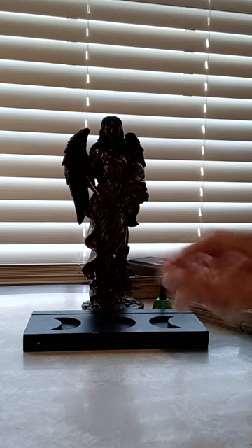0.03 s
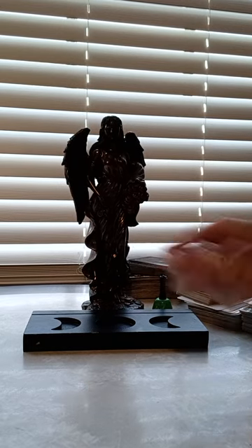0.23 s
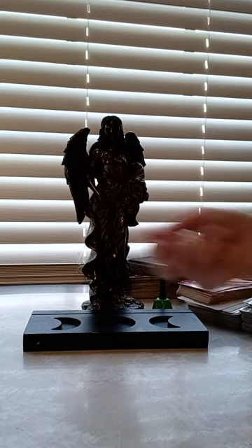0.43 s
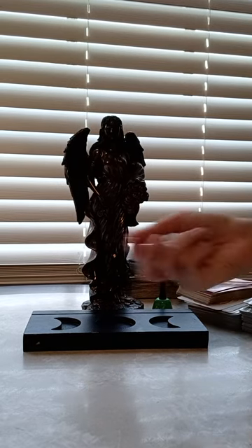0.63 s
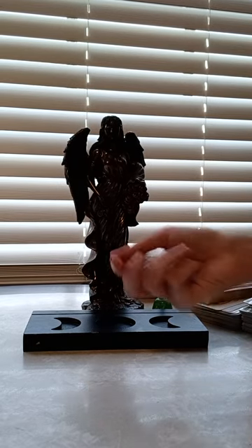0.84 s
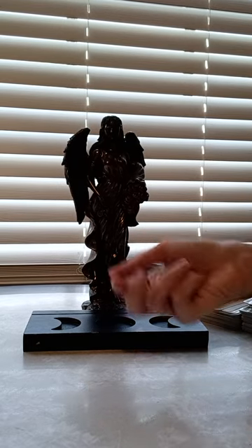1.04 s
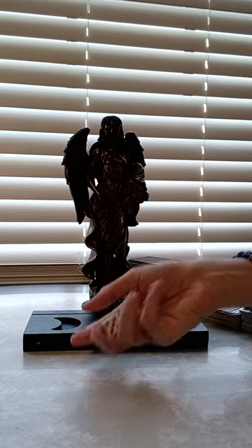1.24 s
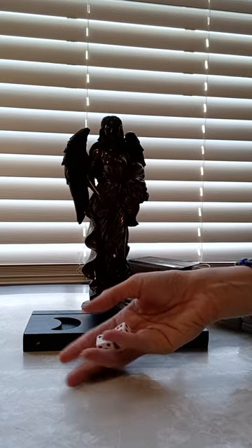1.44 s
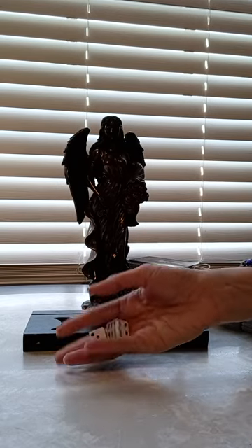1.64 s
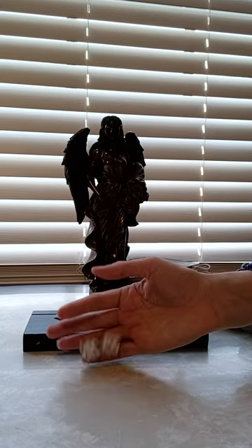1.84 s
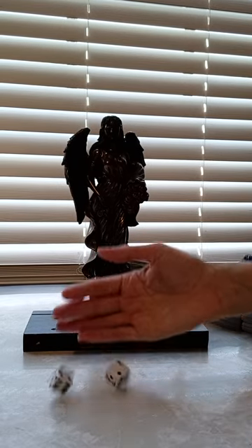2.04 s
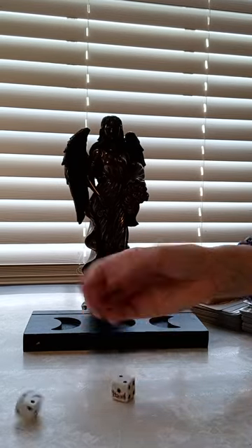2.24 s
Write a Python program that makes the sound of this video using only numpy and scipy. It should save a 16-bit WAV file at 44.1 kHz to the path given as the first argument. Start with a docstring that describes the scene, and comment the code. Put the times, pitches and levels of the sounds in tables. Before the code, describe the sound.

Dice shaken in a hand give bright, irregular clicks, a brief lull follows, then a dense run of hard knocks as they roll on a table, with short room reflections and a faint low rumble beneath.

```python
"""Dice shaken and thrown

Two plastic dice click in a cupped hand, right of a phone, in a small quiet room: broad resonances that swell and die.
They roll off the palm and tumble on a hard table top: each contact ticks, knocks and rings the table's modes.
The room answers with decaying noise; beneath lie a steady hush and a wavering rumble, noise in low resonances."""
import sys
import numpy as np
from scipy import signal
from scipy.io import wavfile

SR = 44100
rng = np.random.default_rng(int(sys.argv[2]) if len(sys.argv) > 2 else 0)


def unload_wav(signal):
    """Save mono or channel-first audio to the path in sys.argv[1] as 16-bit WAV at rate SR, clipped to [-1, 1]."""
    wavfile.write(
        sys.argv[1],
        SR,
        np.round(np.clip(np.atleast_2d(signal).T, -1, 1) * 32767).astype(np.int16),
    )


def nominal_scale(level):
    """Amplitude ratio for a level in decibels (scalar or array-like)."""
    x = np.asarray(level, float) / 20
    return 10 ** x


N = 100900  # samples

# Room air. Each row: frequency in Hz, relative density in dB per Hz.
AIR_SPECTRUM = [(25, -36.5), (60, -16), (149, -5.5), (285, -10), (405, -14), (607, -13), (1000, -18),
                (1520, -23.5), (1890, -22.5), (2900, -30.5), (4200, -33.5), (6200, -33.5), (8000, -48),
                (11000, -54.5), (15000, -46)]
# Likeness of the channels in all diffuse noise. Each row: frequency in Hz, left-right correlation from -1 to 1.
CHANNEL_LIKENESS = [(60, 0.92), (180, 1), (550, 0.54), (1650, -0.18), (4970, -0.13), (15000, -0.067)]
# Channel balance of the air. Each row: frequency in Hz, left minus right in dB.
AIR_BALANCE_DB = [(60, 8.5), (180, 0), (550, -3), (1650, -4.5), (4970, 4), (15000, 1.5)]
AIR_RMS_DB = -66.5

# Rumble resonances. Each row: frequency in Hz, width in Hz, relative level in dB.
RUMBLE_MODES = [(62, 27, -13), (94.8, 6.7, -8.5), (152.6, 8.1, -0.6), (206.9, 13, -5), (275.9, 4.7, -5),
                (411, 20, -10.5), (554, 14, -18)]
# Rumble level over time. Each row: time in seconds, level in dB.
RUMBLE_LEVEL = [(0.0, -65.5), (0.148, -65.5), (0.18, -76.5), (0.57, -89), (0.62, -59), (0.712, -68),
                (0.734, -53.5), (0.954, -59.5), (0.976, -92), (1.184, -69.5), (1.47, -65.5), (1.546, -54),
                (1.59, -76), (1.716, -62.5), (1.826, -56), (1.97, -54.5)]
# Share of the swell that each rumble resonance follows, one number a resonance, no unit.
RUMBLE_FOLLOWS = [0.62, .6, 0.79, 0.73, 0.26, 0.35, 0.34]
RUMBLE_FLICKER_DB, RUMBLE_FLICKER_HZ, RUMBLE_PAN_DB = -0.5, 1.3, -1  # pan: left minus right

# Die on die in the hand. Each row: start in seconds, level in dB, extra level of the dull parts in dB,
# extra level of the bright parts in dB, room send relative to the direct click in dB.
HAND_CLICKS = [(0.0468, -20.5, -33, -17, 2.5), (0.0506, -29, -32, -28, -1),
               (0.0526, -25, -19.5, -21.5, 2.5), (0.0644, -36.5, -29, -23, -0.5),
               (0.0714, -29, -29, -18, -1.5), (0.154, -13.5, -25.5, -31.5, -2),
               (0.1679, -27.5, -22, -25, -4), (0.188, -36, -11, -33, 5.5), (0.23, -25, -24, -18, 6.5),
               (0.2367, -27.5, -20, -14.5, -3.5), (0.2472, -26, -21.5, -44, 5.5),
               (0.2573, -46, -4, -5, -12.5), (0.2688, -36, -13, -22, -2.5), (0.2916, -32.5, -26, -31, 8.5),
               (0.3167, -23.5, -35, -29, -8.5), (0.3522, -16, -30.5, -24.5, -1),
               (0.369, -35.5, -13.5, -32, 1.5), (0.422, -19.5, -22, -21, 4.5), (0.4273, -30, -34, -37, 14),
               (0.4336, -42, -23, -28, -5), (0.5437, -20.5, -29.5, -44, -1.5),
               (0.609, -23.5, -25, -12.5, 5), (0.6201, -32.5, -17, -21, -1), (0.6915, -25, -8.5, -10, 3),
               (0.699, -28, -2.5, -31, -12.5), (0.7569, -32.5, -19, -14.5, 8.5), (0.7744, -43, 2, -22, 1.5),
               (0.7865, -31.5, -13, -4.5, 2.5), (0.7908, -45, -1, -26, -1.5), (0.8229, -43, -23, -29, -1),
               (0.8422, -34.5, -19, -29, -0.5), (0.868, -33.5, -29, -28, -11),
               (0.9774, -29.5, -36, -12.5, 3.5), (0.9848, -52, -3, -11, -6), (0.9918, -46, -30, -9, -21),
               (1.0043, -41, -35, -12, -6), (1.038, -23, -44, -22.5, -9.5), (1.065, -33, -24.5, -35, -3.5),
               (1.171, -30, -34.5, -13.5, 2), (1.1766, -33.5, -33, -11, -5), (1.2874, -28, -29, -16.5, 2),
               (1.2987, -44.5, -24, -13, 0), (1.3157, -29.5, -34, -17, -5), (1.3287, -31, -38, -23.5, -11),
               (1.343, -42, -36, -14, -14.5), (1.3528, -39.5, -37, -20.5, -21.5),
               (1.3544, -40.5, -28, -12, -16.5), (1.7699, -41.5, -25, -14, -9.5),
               (1.7776, -48, -28, -41, 4), (1.7895, -48, -12, -42, -0.5), (1.797, -44.5, -20, -17, -12),
               (1.8001, -45.5, -28, -23.5, -20.5), (1.8077, -48.5, -23.5, -20.5, -21),
               (1.9459, -59, -46.5, -23, -8), (1.973, -50, -33, -29, -11.5)]
# Broad resonances of a die click as the phone hears it; the one near 5.9 kHz is probably the microphone's.
# Each row: frequency in Hz, relative level in dB, t60 in seconds before shortening,
# share of the dull dB, share of the bright dB.
CLICK_PARTS = [(2090, -2.5, 0.0028, 0.75, 0), (2902, 2, 0.0045, 0.8, 0), (3757, -6.5, 0.0024, 0.3, 0),
               (4650, -6, 0.0048, 0.17, 0), (5924, -2.5, 0.0044, 0, 0), (7050, 0, 0.003, 0, 0.42),
               (8880, 6.5, 0.0022, 0, 0.81), (10600, -4.5, 0.00074, 0, 0.72),
               (14970, -13.5, 0.0016, 0, 0.3)]
PART_SPREAD_DB, PITCH_SPREAD_SHARE, PHASE_SPREAD_CYCLES = 1.5, 0.045, 0.12
DIRECT_T60_SHARE, ROOM_T60_SHARE = 0.82, 0.44
DIE_LOW_CUT_HZ = 2020
# The more the fingers hide a click, the more central it is. Pan: left minus right.
HAND_PAN_DB, HAND_PAN_PER_ROOM_DB, LEFT_LAG_S = -6.5, 0.5, 0.0002765

# Room tail. Each row: frequency in Hz, relative level in dB, t60 in seconds.
ROOM_TAIL = [(300, 1.5, 0.63), (720, 3.5, 0.68), (1500, 4.5, 0.15), (2600, 2.5, 0.44), (3890, 11.5, 0.27),
             (5740, 3.5, 0.33), (9630, 5, 0.2), (12880, 12.5, 0.21), (15500, -6, .26)]
ROOM_DELAY_S, ROOM_RISE_S, ROOM_GAIN_DB = 0.001, 0.0083, 0
ECHOES_PER_S, ECHO_DB, ECHO_T60_S = 300, 2, 0.067

# Die on table. Each row: start in seconds, knock level in dB, tick level relative to the knock in dB.
TABLE_BOUNCES = [(1.9874, -21.5, -10), (1.9925, -18.5, -5.5), (2.0045, -19, -15.5), (2.0169, -27, -5.5),
                 (2.044, -18.5, -6), (2.073, -21.5, -6), (2.0765, -20.5, -5), (2.0967, -20.5, -11),
                 (2.1103, -21.5, -5), (2.135, -21.5, -12.5), (2.1555, -20.5, -21.5), (2.162, -24.5, -11),
                 (2.1777, -20.5, -14), (2.187, -22.5, -5.5), (2.200, -25.5, -10.5), (2.2156, -23, -6),
                 (2.2287, -19.5, -6.5), (2.243, -31, -2.5), (2.2598, -21.5, -5.5), (2.268, -22, -7.5),
                 (2.279, -29, -14)]
# Table top modes. Each row: frequency in Hz, relative level in dB, t60 in seconds of one resonator pass.
TABLE_MODES = [(102, -32.5, 0.18), (215, -30, 0.087), (328.3, -26, 0.095), (430.8, -23, 0.105),
               (565.5, -27, 0.053), (708, -21.5, .04), (870, -24.5, 0.036), (975, -21, 0.035),
               (1229, -10, 0.031), (1515, -12, 0.0057), (1773, -4, 0.0091), (1960, -13.5, 0.0036),
               (2304, -11.5, 0.0092), (2730, -14.5, 0.0047), (3290, -19, 0.016), (3697, -20, 0.0061)]
MODE_SPREAD_DB, DOUBLE_ABOVE_HZ, KNOCK_LAG_S = 2, 1500, 0.00082
TICK_GAIN_DB, TICK_DULL_DB, TICK_BRIGHT_DB, TICK_ROOM_GAIN_DB = 7, -12.5, -23.5, 9
TICK_PAN_DB, TABLE_PAN_DB, TABLE_ROOM_GAIN_DB = -2.5, -9, 2.5
ROLL_COUNT, ROLL_DB, ROLL_SPREAD_DB = 40, -41, 2  # small edge contacts

MIC_BASS_CUT_HZ = 65.5


def rms_one(x):
    """Scale to rms 1."""
    return x / np.sqrt(np.mean(x ** 2) + 1e-20)


def at_hz(points, hz, column=1):
    """Read a table on a log-frequency axis."""
    points = np.array(points)
    return np.interp(np.log(hz), np.log(points[:, 0]), points[:, column])


def pan_pair_db(pan_db):
    """Left and right gains in dB, as a column, whose difference is pan_db."""
    return np.array([[pan_db / 2], [-pan_db / 2]])


def high_pass(x, order, hz):
    """Butterworth low cut."""
    return signal.sosfilt(signal.butter(order, hz, "high", fs=SR, output="sos"), x)


def bands(length):
    """Third-octave bands of stereo noise with the tabled likeness; neighbours are unrelated."""
    edges_hz = 22 * 2 ** (np.arange(30) / 3)
    white = rng.standard_normal((2, 2, length))
    for k, (low, high) in enumerate(zip(edges_hz, edges_hz[1:])):
        hz = np.sqrt(low * high)
        band = signal.butter(2, [low, high], "band", fs=SR, output="sos")
        mid, side = signal.sosfilt(band, white[k % 2])
        alike = np.clip(at_hz(CHANNEL_LIKENESS, hz), -1, 1)
        yield hz, np.sqrt(1 + alike) * mid + np.sqrt(1 - alike) * side * [[1], [-1]]


def drift(rate_hz):
    """Slow noise of rms 1: white noise through a two-pole low-pass, run at every 40th sample."""
    r = np.exp(-2 * np.pi * rate_hz * 40 / SR)
    white = rng.standard_normal(N // 40 + 2002)
    slow = rms_one(signal.lfilter([1], [1, -2 * r, r * r], white)[2000:])
    return np.interp(np.arange(N) / 40, np.arange(len(slow)), slow)


def ring(clicks, hz, t60_s):
    """Two-pole resonator: a unit click starts a decaying sine of height 1."""
    r, w = nominal_scale(-60 / (t60_s * SR)), 2 * np.pi * hz / SR
    return signal.lfilter([0, np.sin(w)], [1, -2 * r * np.cos(w), r * r], clicks + 1e-18)


def swell_ring(clicks, hz, t60_s):
    """The same resonator twice: builds up, peaks near height 1, dies."""
    twice = ring(ring(clicks, hz, t60_s), hz, t60_s)
    return twice * 2 * np.e * np.log(1000) / (t60_s * SR)


def click_train(start_s, sizes):
    """Single-sample clicks of given sizes at given times."""
    out = np.zeros(N)
    at = np.clip((np.asarray(start_s) * SR).astype(int), 0, N - 1)
    np.add.at(out, at, sizes)
    return out


def delay_left(x):
    """Delay the left channel, as for a source on the right."""
    n = np.arange(N)
    return np.array([np.interp(n - LEFT_LAG_S * SR, n, x[0]), x[1]])


def air():
    """Steady hush of the room: noise shaped band by band."""
    hush = 0
    for hz, noise in bands(N):
        hush = hush + noise * nominal_scale(at_hz(AIR_SPECTRUM, hz) + pan_pair_db(at_hz(AIR_BALANCE_DB, hz)))
    return nominal_scale(AIR_RMS_DB) * rms_one(hush)


def rumble():
    """Noise in narrow low resonances that swell and fade, each to its own extent."""
    s, db = np.transpose(RUMBLE_LEVEL)
    swell_db = np.interp(np.arange(N) / SR, s, db - db.mean())
    out = 0
    for (hz, width_hz, mode_db), share in zip(RUMBLE_MODES, RUMBLE_FOLLOWS):
        settled = ring(rng.standard_normal(N + SR), hz, 2.2 / width_hz)[SR:]
        flicker_db = RUMBLE_FLICKER_DB * drift(RUMBLE_FLICKER_HZ)
        out = out + rms_one(settled) * nominal_scale(db.mean() + mode_db + share * swell_db + flicker_db)
    return out * nominal_scale(pan_pair_db(RUMBLE_PAN_DB))


def die(start_s, db, dull_db, bright_db, t60_share=DIRECT_T60_SHARE):
    """Short clicks of broad resonances that swell and die; strength, pitch and phase vary every time."""
    hz, part_db, t60_s, dull, bright = np.transpose(CLICK_PARTS)
    chance = rng.standard_normal((len(start_s), 3, len(CLICK_PARTS)))
    strength, pitch, phase = chance.transpose(1, 0, 2)
    level_db = part_db + np.c_[db] + dull * np.c_[dull_db] + bright * np.c_[bright_db]
    level = nominal_scale(level_db + PART_SPREAD_DB * strength)
    t = np.arange(400)[:, None, None] / SR
    decays = t * np.log(1000) / (t60_s * t60_share)
    envelope = np.e * decays * np.exp(-decays)  # peaks at 1
    cycles = hz * (1 + PITCH_SPREAD_SHARE * pitch) * t + PHASE_SPREAD_CYCLES * phase
    cycles = cycles + np.arange(len(CLICK_PARTS)) / 2  # alternate signs
    shapes = np.sum(level * envelope * np.sin(2 * np.pi * cycles), axis=2)
    out = np.zeros(N + len(t))
    np.add.at(out, (start_s * SR).astype(int) + np.arange(len(t))[:, None], shapes)
    return high_pass(out[:N], 3, DIE_LOW_CUT_HZ)


def hand():
    """Direct clicks, panned by how open the hand is, and what they send to the room."""
    s, db, dull_db, bright_db, room_db = np.transpose(HAND_CLICKS)
    pan_db = HAND_PAN_DB + HAND_PAN_PER_ROOM_DB * (room_db - room_db.mean())
    direct = [die(s, db + gain_db, dull_db, bright_db) for gain_db in (pan_db / 2, -pan_db / 2)]
    return delay_left(direct), die(s, db + room_db, dull_db, bright_db, ROOM_T60_SHARE)


def room(sent):
    """Echoes thicken into a noise tail that dies band by band, with bursts for lone early echoes."""
    t = np.arange(SR // 2) / SR
    lone = (rng.random(len(t)) < ECHOES_PER_S / SR) * rng.random(len(t))
    lone = lone * nominal_scale(ECHO_DB - 60 * t / ECHO_T60_S)
    lumps = 1 + np.convolve(lone, np.hanning(41), "same")
    tail = 0
    for hz, noise in bands(len(t)):
        if hz > 150:
            tail = tail + noise * nominal_scale(at_hz(ROOM_TAIL, hz) - 60 * t / at_hz(ROOM_TAIL, hz, column=2))
    tail = tail * lumps * np.clip((t - ROOM_DELAY_S) / ROOM_RISE_S, 0, 1)
    tail = tail / np.sqrt(np.sum(tail ** 2) / 2)  # unit energy per channel on average
    return nominal_scale(ROOM_GAIN_DB) * signal.fftconvolve(sent[None], tail, axes=1)[:, :N]


def table():
    """Each contact ticks like a die, then knocks every table mode with a strength of its own."""
    s, db, tick_db = np.transpose(TABLE_BOUNCES)
    when, size = rng.random((ROLL_COUNT, 2)).T
    tick_db = np.r_[tick_db, np.full(ROLL_COUNT, tick_db.mean())]
    db = np.r_[db, ROLL_DB - ROLL_SPREAD_DB * np.log(size + 0.05)]
    s = np.r_[s, s[0] + when * (N / SR - s[0])]  # from the first bounce to the end
    spread_db = rng.normal(0, MODE_SPREAD_DB, (len(s), len(TABLE_MODES)))
    knock = 0
    for k, (hz, mode_db, t60_s) in enumerate(TABLE_MODES):
        sizes = nominal_scale(db + mode_db + spread_db[:, k]) * (-1) ** k
        resonate = swell_ring if hz > DOUBLE_ABOVE_HZ else ring
        knock = knock + resonate(click_train(s + KNOCK_LAG_S, sizes), hz, t60_s)
    ticks = [die(s, db + tick_db + TICK_GAIN_DB + gain_db, TICK_DULL_DB, TICK_BRIGHT_DB)
             for gain_db in (TICK_PAN_DB / 2, -TICK_PAN_DB / 2)]
    near = knock * nominal_scale(pan_pair_db(TABLE_PAN_DB)) + delay_left(ticks)
    room_ticks = die(s, db + tick_db + TICK_ROOM_GAIN_DB, TICK_DULL_DB, TICK_BRIGHT_DB, ROOM_T60_SHARE)
    return near, (knock + room_ticks) * nominal_scale(TABLE_ROOM_GAIN_DB)


def scene():
    """Background, hand, table and the room's answer to both."""
    clicks, clicks_sent = hand()
    knocks, knocks_sent = table()
    return air() + rumble() + clicks + knocks + room(clicks_sent + knocks_sent)


def band_limit(x):
    """A steep low-pass at the top of the band."""
    return signal.sosfilt(signal.butter(12, 17000, fs=SR, output="sos"), x)


def record(dry):
    """Phone microphones with a bass cut."""
    mix = high_pass(dry, 2, MIC_BASS_CUT_HZ)
    return band_limit(mix)


dry = scene()
out = record(dry)
unload_wav(out)
```